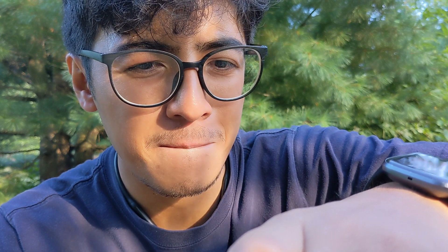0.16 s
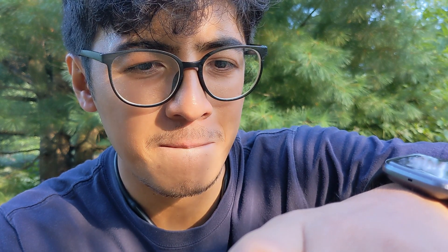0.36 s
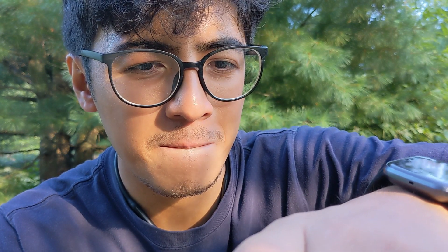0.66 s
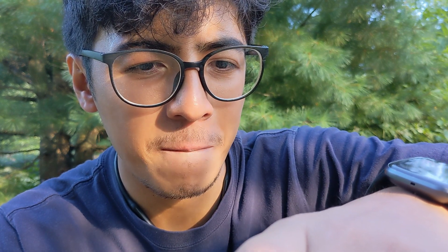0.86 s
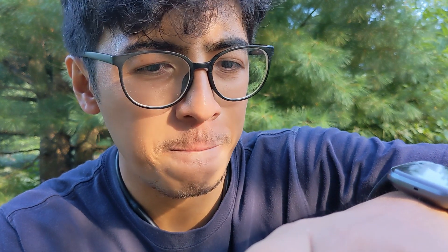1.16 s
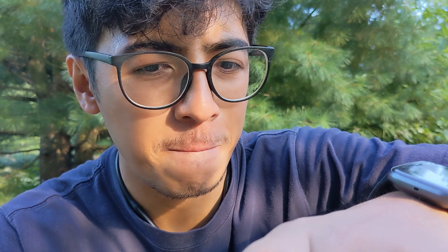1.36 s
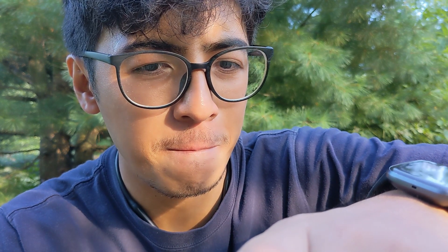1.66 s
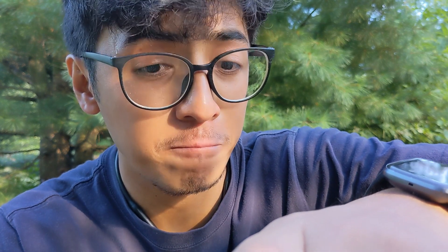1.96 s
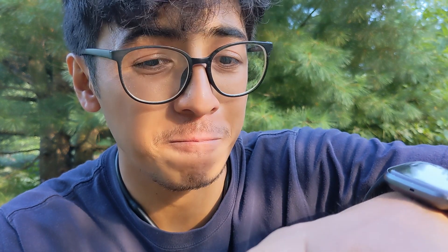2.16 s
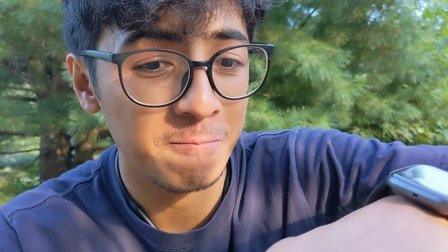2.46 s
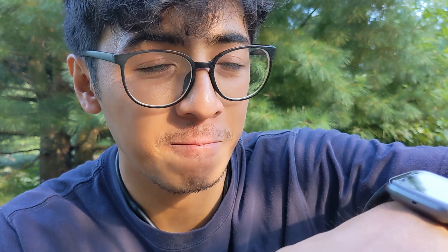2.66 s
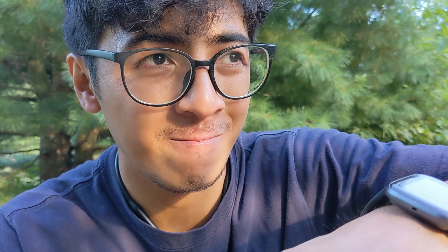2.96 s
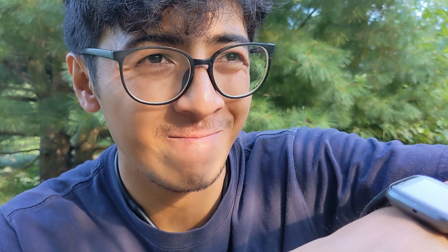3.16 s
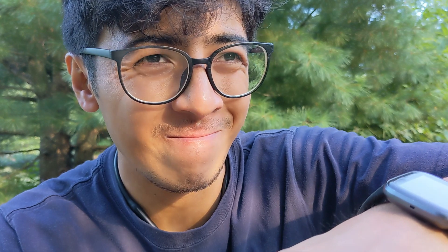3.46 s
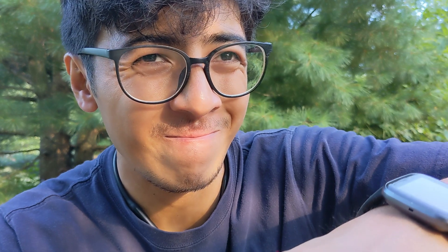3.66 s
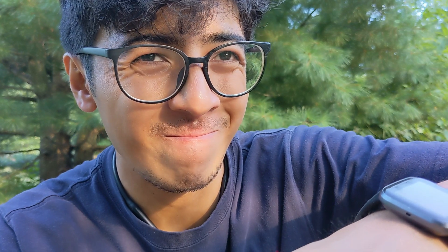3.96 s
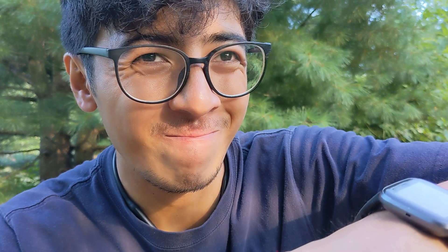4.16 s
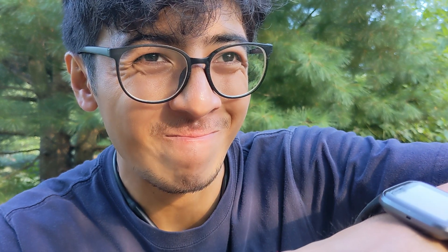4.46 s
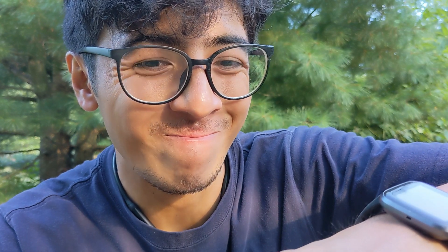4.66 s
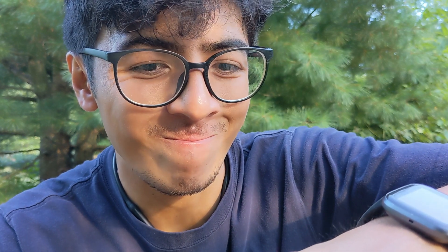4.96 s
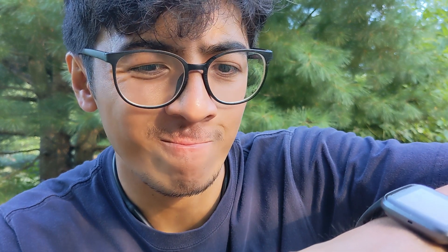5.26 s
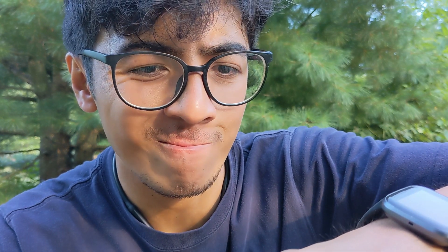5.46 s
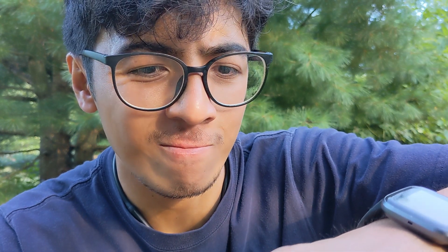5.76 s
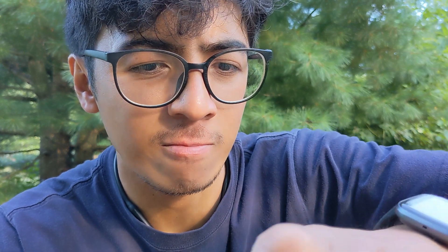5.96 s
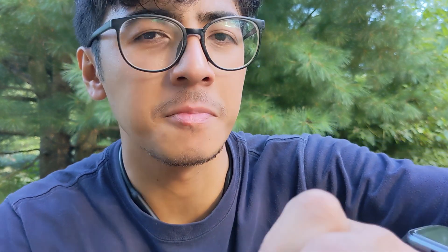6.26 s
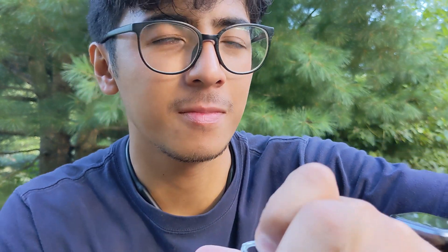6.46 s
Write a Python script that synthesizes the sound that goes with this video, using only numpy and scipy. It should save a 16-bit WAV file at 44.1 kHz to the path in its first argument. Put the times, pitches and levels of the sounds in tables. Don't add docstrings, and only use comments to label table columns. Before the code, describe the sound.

Crickets trill steadily among trees while a can close to the right spits a short hiss, pops, then clicks and snaps metallically.

```python
import sys
import numpy as np
from scipy import signal
from scipy.fft import rfft, irfft, next_fast_len
from scipy.io import wavfile

SR = 44100
rng = np.random.default_rng(int(sys.argv[2]) if len(sys.argv) > 2 else 0)


def generate_wav(signal):
    frames = np.transpose(np.atleast_2d(signal))
    scaled = np.clip(frames, -1, 1) * 32767
    pcm = np.round(scaled).astype(np.int16)
    wavfile.write(sys.argv[1], SR, pcm)


def magnitude_from_level(level_db):
    exponent = np.asarray(level_db, float) / 20
    return 10 ** exponent


N = 291942
T = np.arange(N) / SR


def rms_one(x):
    return x / np.sqrt(np.mean(x ** 2) + 1e-20)


def in_time(rows, off=0):
    s, *columns = np.transpose(rows)
    sounding = np.clip(np.minimum(T - s[0], s[-1] - T) / 0.00067 + off, 0, 1)
    return [np.interp(T, s, c) for c in columns] + [sounding]


def at_hz(points, hz):
    table_hz, value = np.transpose(points)
    return np.interp(np.log(hz + 1), np.log(table_hz), value)


def swell(at, attack, hold, release):
    rise = (T - at) / attack
    fall = 1 + (at + attack + hold - T) / release
    return np.clip(np.minimum(rise, fall), 0, 1)


def drift(rate):
    knots = rng.standard_normal(300)
    return np.interp(T * min(rate, 39), np.arange(len(knots)), knots)


def noise(shape):
    size = next_fast_len(N)
    hz = np.fft.rfftfreq(size, 1 / SR)
    return rms_one(irfft(shape(hz) * rfft(rng.standard_normal(size)), size)[:N])


def humps(peaks, hz):
    return np.sqrt(sum(magnitude_from_level(2 * db) / (1 + (2 * (hz - f) / w) ** 2) ** 2 for f, w, db in peaks))


def placed(x, pan_db, lag):
    late = np.interp(np.arange(N) - lag, np.arange(N), x)
    return np.array([late * magnitude_from_level(pan_db / 2), x * magnitude_from_level(-pan_db / 2)])


def foliage(x, t60):
    s = np.arange(int(.3 * SR)) / SR
    tail = rng.standard_normal((2, len(s))) * magnitude_from_level(-60 * s / t60) * (s > .003)
    tail /= np.sqrt(np.sum(tail[0] ** 2))
    return signal.fftconvolve(x[None], tail, axes=1)[:, :N]


# freq_hz, correlation
LIKENESS = [(60, 0.95), (180, 0.92), (550, 0.0042), (1650, -0.056), (4970, -0.022), (15000, -0.13)]
# freq_hz, left_minus_right_db
BALANCE = [(60, -2), (180, -1), (550, -1), (1650, -2.5), (4970, -7.5), (15000, -6.0)]


def far_noise(shape):
    size = next_fast_len(N)
    hz = np.fft.rfftfreq(size, 1 / SR)
    mid, side = rfft(rng.standard_normal((2, size)))
    alike = np.clip(at_hz(LIKENESS, hz), -.9, .99)
    lean = magnitude_from_level(at_hz(BALANCE, hz) / 2)
    mid, side = mid * np.sqrt(1 + alike), side * np.sqrt(1 - alike)
    both = np.array([(mid + side) * lean, (mid - side) / lean])
    return rms_one(irfft(shape(hz) * both, size)[:, :N])


# freq_hz, density_db_per_hz
LEAVES = [(150, -17), (250, -17), (330, -25), (460, -17), (1100, -19.5), (1500, -26.5), (2500, -24.5),
          (3900, -25), (5800, -30), (9700, -32), (12300, -32.5), (15600, -36), (15900, -66)]
# centre_hz, width_hz, level_db
FAR_INSECTS = [(2900, 260, -49), (3200, 310, -49), (4746, 1430, -58.5), (7300, 1600, -55),
               (7940, 2500, -58)]
# freq_hz, density_db_per_hz
RUMBLE = [(11, -49.5), (18, 2), (38, -1.5), (70, -5.5), (93, -3.5), (119, -1), (150, -10.5), (177, -9),
          (320, -39.5), (420, -69.5), (700, -120)]
# time_s, level_db
ROAD = [(0, -43.5), (.6, -43), (1.4, -39.5), (2.8, -44.5), (3.8, -46), (4.7, -44), (5.9, -51.5),
        (6.62, -47)]


def background():
    out = magnitude_from_level(-50.5 + 0.23 * drift(9.2)) * far_noise(lambda hz: magnitude_from_level(at_hz(LEAVES, hz)))
    for centre_hz, width_hz, db in FAR_INSECTS:
        chorus = far_noise(lambda hz: humps([(centre_hz, width_hz, 0)], hz) ** 2)
        out += magnitude_from_level(db + 2.2 * drift(12)) * chorus
    out += magnitude_from_level(in_time(ROAD)[0] + 2.5 * drift(7)) * far_noise(lambda hz: magnitude_from_level(at_hz(RUMBLE, hz)))
    return out


# time_s, pitch_hz, level_db
ENGINES = [
    [(0, 119.5, -43), (.5, 118.4, -43.5), (1.1, 117.2, -43), (1.5, 116.5, -43.5), (1.85, 116.7, -37),
     (1.97, 115, -66)],
    [(.9, 148.8, -52), (1.45, 149, -42.5), (1.8, 153, -40.5), (2.3, 159, -49), (2.85, 161, -52.5),
     (3.1, 153.9, -48), (3.6, 151.6, -49.5), (3.9, 146, -55), (4.7, 144.6, -60)],
    [(3.6, 99, -81), (3.9, 97, -83), (4.9, 91.5, -43.5), (5.8, 91, -67.5), (6.3, 85.6, -49),
     (6.62, 89, -57)],
]


def engines():
    out = 0
    for rows in ENGINES:
        hz, db, sounding = in_time(rows, off=1)
        tone = np.sin(2 * np.pi * np.cumsum(hz) / SR)
        out = out + placed(sounding * magnitude_from_level(db + 1.5 + 2.1 * drift(21)) * tone, -2.2, 0)
    return out


def strokes(cycles, hz, duty, glide_hz, spread_db):
    count = np.floor(cycles + .5).astype(int)
    along = np.clip(((cycles + .5) % 1 - .5) / duty, -.5, .5)
    own = rng.standard_normal((count.max() - count.min() + 1, 3))[count - count.min()]
    shape = np.cos(np.pi * along) ** .7
    pitch_hz = hz + glide_hz * along + 8 * own[:, 0]
    tone = np.sin(2 * np.pi * np.cumsum(pitch_hz) / SR + .9 * own[:, 2])
    return rms_one(shape * magnitude_from_level(spread_db * own[:, 1]) * tone)


# wing_hz, pulses_per_s, start_cycles, slowing_per_s2
TRILL_TIMING = [(3145, 37.578, .28, 0), (3415, 44.8, .13, -.019), (2890, 33.87, .21, -.023),
                (3020, 28.26, .38, -.011), (3290, 41.3, 0, 0)]
# level_db, left_minus_right_db, left_lag_samples, glide_hz
TRILL_LEVEL = [(-37.5, -5.5, 7.8, -240), (-42, -1, 4., -340), (-47.5, -3.5, 6., -300), (-47, -9, 9., -300),
               (-52, -7, 3., -350)]


def tree_crickets():
    out = 0
    for (hz, rate, start, slowing), (db, pan_db, lag, glide_hz) in zip(TRILL_TIMING, TRILL_LEVEL):
        pulses = strokes(start + rate * T + slowing * T ** 2, hz, .72, glide_hz, 2.5)
        song = magnitude_from_level(db + 1.2 * drift(5)) * pulses
        out = out + placed(song, pan_db, lag) + magnitude_from_level(-9.5) * foliage(song, .12)
    return out


# time_s, lead_cycles
CHIRP_WANDER = [(0, 0), (1.5, -.09), (3.6, .08), (4.6, -.07), (5.6, .06), (6.62, -.08)]


def ground_cricket():
    chirps_per_s = 7.305
    cycles = .39 + chirps_per_s * T + in_time(CHIRP_WANDER)[0]
    chirp = strokes(cycles, 7190, .42, 210, 1.2)
    roughness = .9 + .5 * noise(lambda hz: humps([(0, 160, 0)], hz))
    chirp *= magnitude_from_level(1.2 * drift(1.5) + 1.2 * drift(39)) * roughness
    chirp = magnitude_from_level(-57) * (chirp + .4 * np.roll(chirp, round(SR / chirps_per_s / 2)))
    return placed(chirp, -7, 6.8) + magnitude_from_level(-9) * foliage(chirp, .15)


def katydid():
    rasps_per_s = 7.6
    throb = np.clip(np.cos(2 * np.pi * (.1 + rasps_per_s * T + .08 * drift(2))), 0, 1)
    rasp = noise(lambda hz: humps([(8000, 450, 0)], hz) ** 2)
    return placed(magnitude_from_level(-58 + 2.5 * drift(6)) * throb * rasp, -7, 7)


# start_s, length_s, first_pitch_hz, level_db
BIRD = [
    (1.027, .07, 2000, -66),
    (4.645, .165, 2110, -72),
]
BIRD_TUNE = [(0, 1), (.27, .975), (.41, .875), (.58, .835), (.8, .72), (.9, .55), (1, .46)]
# freq_hz, gain_db
CHEST = [(950, 6), (1300, -2), (1600, -10), (1800, 2), (2100, 3)]
# freq_hz, gain_db
THROAT = [(2000, -2), (2400, 5), (3000, 21.5), (3600, 29), (4000, 13), (4200, -14)]


def bird():
    call = 0
    for at, length, first_hz, db in BIRD:
        hz = first_hz * np.interp((T - at) / length, *np.transpose(BIRD_TUNE))
        phase = 2 * np.pi * np.cumsum(hz + 20 * drift(39)) / SR
        first = magnitude_from_level(at_hz(CHEST, hz)) * np.sin(phase)
        second = magnitude_from_level(at_hz(THROAT, 2 * hz)) * np.sin(2 * phase)
        call = call + swell(at, 0.0089, length - .015, .005) * magnitude_from_level(db + 10.0) * (first + second)
    call = call * magnitude_from_level(2 * drift(39)) * (1 + .4 * noise(lambda hz: humps([(0, 120, 0)], hz)))
    return placed(call, -2.5, 3.5) + foliage(call, .45)


# freq_hz, left_minus_right_db
SHADOW = [(60, -7.5), (180, 5.5), (550, -2), (1650, -10), (4970, -17), (15000, -8)]


def near(x, alike):
    hz = np.fft.rfftfreq(N, 1 / SR)
    reflections = np.roll(x, 70) - np.roll(x, 163)
    left = alike * np.roll(x, 9) + (1 - alike) * reflections
    left = irfft(rfft(left) * magnitude_from_level(at_hz(SHADOW, hz)), N)
    return np.array([left, x])


# start_s, length_s, level_db
RUB = [
    (4.746, 0.29, -53.5),
    (4.9, .04, -54),
    (6.005, 0.63, -56),
    (6.083, 0.11, -46.5),
    (6.201, 0.07, -47.5),
    (6.26, 0.056, -53),
    (6.547, 0.062, -51),
]


def fingers():
    grain_size = magnitude_from_level(2.5 * np.minimum(rng.exponential(1, N), 4))
    grains = rng.standard_normal(N) * grain_size * (rng.random(N) < .06)
    hz = np.fft.rfftfreq(N, 1 / SR)
    modes = humps([(1090, 300, 6.5), (1800, 800, 5), (400, 600, -2), (4470, 6400, -4)], hz)
    rub = rms_one(irfft(rfft(grains) * modes, N))
    pressure = 0
    for at, length, db in RUB:
        attack, release = min(0.37 * length, .03), min(0.32 * length, .03)
        hold = max(length - .06, 0.11 * length)
        pressure = pressure + magnitude_from_level(db + 6.5) * swell(at, attack, hold, release)
    return near(rub * pressure, alike=0.93)


# mode_hz, level_db, t60_s, left_minus_right_db
POP = [(1990, 5, .0057, -7), (2730, -5, .0042, 1), (3630, -8.5, .0032, 4), (3790, -3, .0082, 3),
       (4510, -4, .0023, 1), (5330, -.5, .003, -4), (6820, -18.5, .0063, -14), (8220, -7.5, .0039, -7),
       (10470, -11.5, .005, -1), (12530, -16, .0016, 4), (13870, -23.5, .0031, -10)]
# start_s, level_db, mode_hz, t60_s, left_minus_right_db
BUCKLES = [(2.4252, -18, 1690, .008, -1), (2.4276, -4, 3180, .0041, -4), (2.4262, -26, 7430, .0068, -10),
           (2.4322, -19.5, 3460, .0043, -5), (2.4343, -21, 3810, .013, -4), (2.4294, -31, 410, .0057, -1),
           (2.4341, -26.5, 2250, .014, -5), (4.4545, -32.5, 550, 0.017, -1),
           (4.132, -17.5, 5120, 0.014, -10), (5.4, -14.5, 2370, 0.004, 8), (5.4, -30, 830, 0.01, 4),
           (2.8558, -19.5, 2040, 0.0066, -13), (2.9092, -14, 2260, 0.0089, -5),
           (4.9972, -24, 570, 0.003, -12.5)]
# start_s, level_db, mode_hz
DENTS = [(2.467, -51, 1850), (3.1896, -43.5, 1260), (3.2303, -42.5, 1270), (3.4166, -47, 1420),
         (3.6192, -44, 1990), (3.7214, -48, 1360), (3.8346, -43, 1200), (3.9025, -46, 1250),
         (3.9363, -45.5, 1310), (4.092, -43, 1980), (4.1254, -46, 1700), (4.3615, -41, 2030),
         (4.764, -42, 1790), (4.803, -44, 2030), (4.841, -46, 1330), (4.898, -40, 1200),
         (4.9192, -38, 2210), (5.0514, -43, 1980), (6.0481, -44, 2400), (6.056, -48, 1200),
         (6.096, -46, 1560), (6.15, -44, 1900), (6.163, -44, 1150), (6.2761, -46, 1140),
         (6.4637, -46, 1220), (6.472, -47, 1900), (6.5026, -47, 1260), (6.106, -42, 1740),
         (6.137, -36, 1750), (6.2086, -41, 1640), (6.2215, -36, 1700), (6.55, -43, 1730),
         (6.5693, -34, 1530)]


def buckles():
    out = np.zeros((2, N + SR))
    since = np.arange(1500) / SR
    pop_s = 2.429
    rings = []
    for k, (hz, db, t60, pan_db) in enumerate(POP):
        delay = 1.28 / hz * (k % 2) / 2
        rings.append((pop_s + delay, db, hz, t60, pan_db))
    dents = [(s + 0.00063, db + 11.5, hz, .005, -6) for s, db, hz in DENTS]
    for at, db, hz, t60, pan_db in rings + BUCKLES + dents:
        envelope = magnitude_from_level(db - 60 * since / t60) * (1 - np.exp(-since / .0003))
        ring = envelope * np.sin(2 * np.pi * hz * since)
        for side, (lag, lean) in enumerate([(7, 1.58), (0, -2.0)]):
            i = round(at * SR) + lag
            out[side, i:i + len(ring)] += ring * magnitude_from_level(lean * pan_db / 2)
    return out[:, :N]


# start_s, peak_db, dullness_db, extra_left_db
SNAPS = [(1.1432, -20.5, -5.5, 0), (2.2172, -37.5, -0.5, -6.5), (2.854, -15.5, 1.5, -2.5),
         (2.9077, -15.5, 4.5, -14.5), (4.1304, -8.5, -0.5, -5), (4.4205, -29, 3.5, -12),
         (4.4376, -26, 6.5, -10), (4.441, -24, 1.5, -10), (4.5032, -22, 1, -10), (4.5055, -23.5, -3, -17),
         (4.5075, -20, 5, -5.5), (4.5528, -14, -3, -8), (4.995, -11, -5, -8), (5.07, -18, 1.5, -7),
         (5.0882, -19, -1.5, -5.5), (5.0934, -24, 0, -8), (5.0957, -20, -1.5, -10), (5.1036, -21, 0, -7.5),
         (4.134, -29, -3, -5), (5.394, -30, -3, -8), (5.4158, -40, -5, -5), (5.2714, -17.5, -3.5, -14.5),
         (5.3849, -21, -0.5, -11), (5.3982, -11, 2.5, -4), (5.914, -34.5, -1.5, -4), (6.0463, -34.5, -6, 5)]
# start_s, peak_db
TICKS = [(3.5674, -35), (3.7202, -37.5), (3.9037, -39), (4.092, -37), (4.3605, -34), (4.3685, -39),
         (4.4995, -33), (4.5014, -30), (4.5045, -28), (4.5098, -31), (4.516, -36), (4.4444, -30),
         (4.486, -37), (4.7637, -37), (4.8054, -38), (4.8404, -34.5), (4.8964, -36), (4.9174, -34),
         (5.0504, -43), (5.3915, -38), (5.4367, -44), (6.222, -38), (6.5666, -33)]
# freq_hz, gain_db
CRACK = [(100, -24), (450, -16.5), (800, -27.5), (1300, -8.5), (1900, 0.5), (3200, -2), (5200, 2.5),
         (7500, 4), (10500, 7.5), (12500, 3), (15000, -5), (16500, -17)]
# centre_hz, width_hz, level_db
LID = [(1700, 4200, 7), (3700, 1030, 12.5), (4970, 650, 9.5), (7300, 800, 10), (8940, 810, 9),
       (10600, 800, -1), (14900, 1500, -13)]
# freq_hz, left_minus_right_db
LEFT_SHADE = [(300, -40), (800, 20.5), (1600, -3.5), (2700, 7), (4200, -0.5), (5300, -2), (7500, -42),
              (10500, -20), (12500, -4), (15000, 3)]


def snaps():
    out = np.zeros((2, N + SR))
    s, hz = np.arange(1024) / SR - .003, np.fft.rfftfreq(1024, 1 / SR)
    rebounds = [(at + 0.01, db - 42.5, dull_db, left_db) for at, db, dull_db, left_db in SNAPS]
    ticks = [(at, db, 6, -5) for at, db in TICKS]
    hits = SNAPS + rebounds + ticks
    lid = humps(LID, hz)
    buzz = .03 * magnitude_from_level(-60 * s / .017)
    echo = .007 * np.exp(-((s - .0045) / .0007) ** 2)
    dying = (s > 0) * (buzz + echo)
    sudden = np.exp(-(s / np.where(s < 0, .0004, .0014)) ** 2)
    for (at, db, dull_db, left_db), own in zip(hits, rng.standard_normal((len(hits), 3, 1024))):
        crack = own[0] * np.exp(-(s / 0.00015) ** 2) + .5 * own[2] * (s > 0) * np.exp(-s / .0006)
        crack = rfft(crack)
        crack /= np.abs(crack) ** .75 + 1e-3
        crack = rfft(irfft(crack) * sudden)
        crack *= 1.5 / np.sqrt(np.mean(np.abs(crack) ** 2))
        tilt = [(2400, 3.5 + dull_db), (3600, 0), (8000, 0.013), (9000, -4.5 - dull_db)]
        colour = magnitude_from_level(db + 16.5 + at_hz(CRACK, hz) + at_hz(tilt, hz))
        right = crack + rfft(own[1] * dying) * lid
        left = crack + rfft((0.51 * own[1] + 1.73 * own[2]) * dying) * lid
        left = left * magnitude_from_level(at_hz(LEFT_SHADE, hz) + left_db)
        i = round((at - .0011) * SR)
        out[0, i + 9:i + 1033] += irfft(left * colour)
        out[1, i:i + 1024] += irfft(right * colour)
    return out[:, :N]


# centre_hz, width_hz, level_db
SLIT_WIDE = [(11100, 350, -4), (12000, 450, 0), (13100, 450, 0)]
# centre_hz, width_hz, level_db
SLIT_FINE = [(14100, 600, 0), (15100, 600, -2)]
# start_s, attack_s, hold_s, release_s
GAPE = (0.092, 0.036, 0.43, .05)


def seep():
    lift_s, rise_s = 0.928, 0.052
    gape, lift = swell(*GAPE), swell(lift_s, rise_s, 1, 1)
    fade_db = 128 * np.clip(T - lift_s - rise_s, 0, 1)
    whistle_db = -73 + lift * (37.5 - fade_db)
    octave_db = -63.5 + 4.0 * gape + 17.5 * swell(lift_s + 0.037, 0.025, 1, 1)
    wide_db = -60 + 7.5 * gape + 1.8 * lift + 1.8 * drift(26.4) + 6
    fine_db = -53.5 + 2.7 * drift(25) + 5.5
    out = magnitude_from_level(wide_db) * noise(lambda hz: humps(SLIT_WIDE, hz) + 0.11 * (abs(hz - 12200) < 1800))
    out += magnitude_from_level(fine_db) * noise(lambda hz: humps(SLIT_FINE, hz) + 0.23 * (abs(hz - 14700) < 1200))
    out += magnitude_from_level(whistle_db + 1.5) * noise(lambda hz: humps([(4740, 200, 0)], hz) ** 1.5)
    out += magnitude_from_level(octave_db + 3.5) * noise(lambda hz: humps([(9380, 1200, 0)], hz))
    return out


# freq_hz, density_db_per_hz
JET = [(1470, -32.5), (2500, -17), (3370, -23), (4040, -9), (6680, -2), (7880, -3.5), (10900, -4),
       (12500, 0.5), (14700, -4.5), (15700, -8), (16400, -34)]
# centre_hz, width_hz, level_db
JET_TONES = [(6890, 300, -3), (9300, 200, -5), (11200, 200, 0), (14100, 200, -4), (14900, 200, -3)]


def burst(since):
    emptying_db = 57 * since
    closing_db = 3300 * np.maximum(since - 0.18, 0) ** 2
    jet_db = -26.5 - emptying_db - closing_db
    spit_db, spit = 11.5, np.exp(-since / 0.0029)
    bright = noise(lambda hz: magnitude_from_level(at_hz(JET, hz)) * (1 + 1.5 * humps(JET_TONES, hz)))
    dull = noise(lambda hz: humps([(2110, 1120, 0)], hz))
    jet = magnitude_from_level(jet_db + spit_db * spit + 6.0 + 1.1 * drift(35.34)) * bright
    jet += magnitude_from_level(jet_db - 25.5 + (spit_db + 12.5) * spit + 11.0) * dull
    squeak_s = 1.376
    squeak_hz = 2700 - 55000 * np.clip(T - squeak_s, 0, .03)
    squeak = np.sin(2 * np.pi * np.cumsum(squeak_hz) / SR)
    return jet + magnitude_from_level(-53) * swell(squeak_s, 0.0085, 0.011, .007) * squeak


def gas():
    burst_s = 1.142
    since = np.maximum(T - burst_s, 0)
    opening = np.clip(since / 0.00025, 0, 1)
    return near((T < burst_s) * seep() + opening * burst(since), alike=0.85)


# start_s, left_dip_db, right_dip_db, hold_s
DUCKS = [(1.152, -23, -24.5, .12), (1.247, -20, -25, .1), (1.33, -17, -18.5, 0.096),
         (2.434, -22.5, -23.5, .19), (2.85, -4, -5, .06), (2.905, -10, -9.5, 0.18),
         (4.136, -11.5, -12, 0.18), (4.5, -3.5, -5, 0.087), (4.567, -10.5, -9, 0.16), (4.993, -7, -9, 0.13),
         (5.085, -12, -13.5, 0.17), (5.283, -11.5, -13, .14), (5.421, -20.5, -26.5, 0.17)]


def gain_control():
    gain_db = np.zeros((2, N))
    for at, left_db, right_db, hold in DUCKS:
        since = T - at
        drop = np.clip(since / 0.0027, 0, 1)
        creep = 1 - 0.43 * np.clip(since / 0.17, 0, 1)
        recovery = np.clip(1 - (since - hold) / 0.051, 0, 1)
        gain_db = np.minimum(gain_db, drop * creep * recovery * np.array([[left_db], [right_db]]))
    return magnitude_from_level(gain_db)


def scene():
    far = background() + engines() + tree_crickets() + ground_cricket() + katydid()
    close = bird() + fingers() + buckles() + snaps() + gas()
    return far + close / gain_control()


def roll_off(x):
    return signal.sosfilt(signal.butter(12, 16520, fs=SR, output="sos"), x)


def record(dry):
    band = signal.butter(2, [2500, 14000], "band", fs=SR, output="sos")
    hiss = magnitude_from_level(-69.0) * signal.sosfilt(band, rng.standard_normal((2, N)))
    mix = np.clip(dry * gain_control() + hiss, -1, 1)
    return roll_off(mix)


dry = scene()
out = record(dry)
generate_wav(out)
```